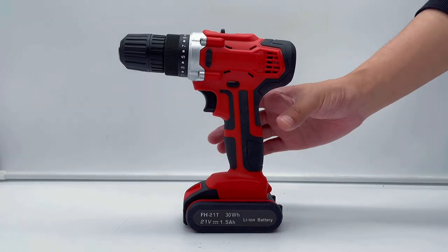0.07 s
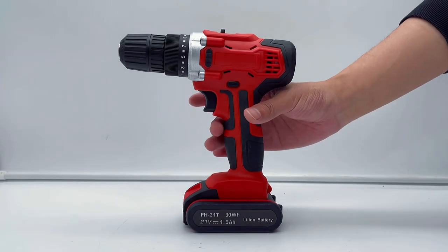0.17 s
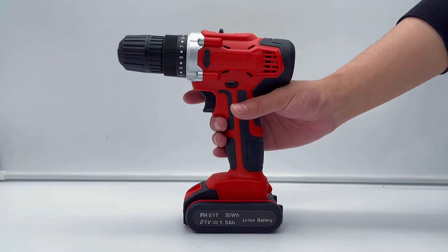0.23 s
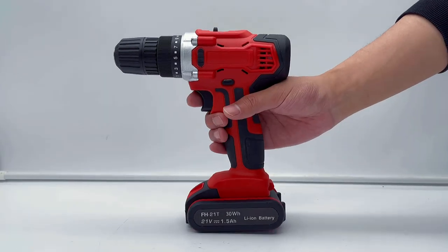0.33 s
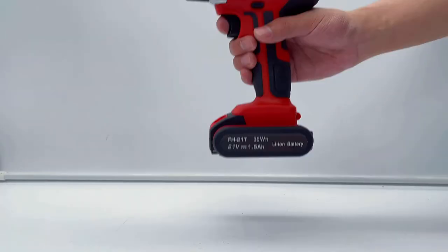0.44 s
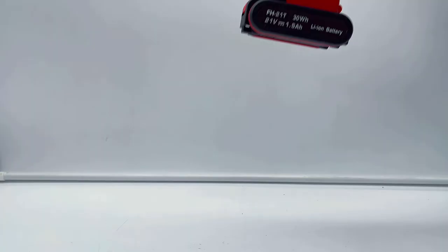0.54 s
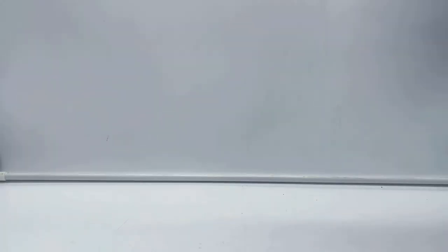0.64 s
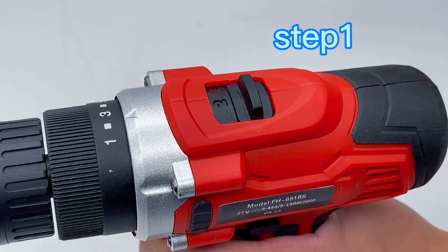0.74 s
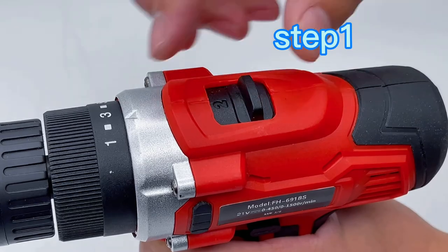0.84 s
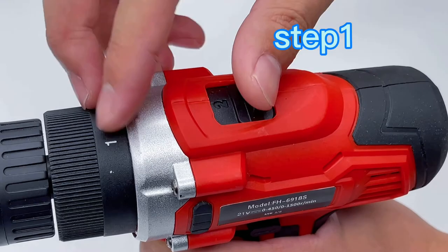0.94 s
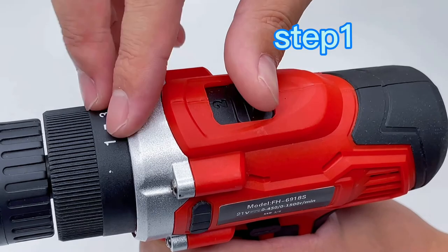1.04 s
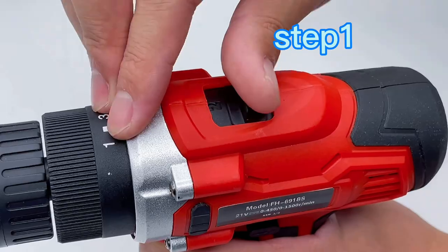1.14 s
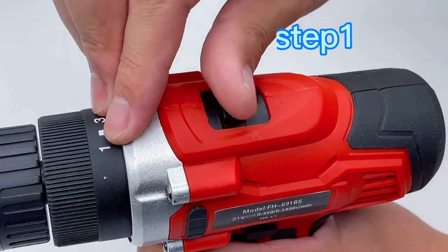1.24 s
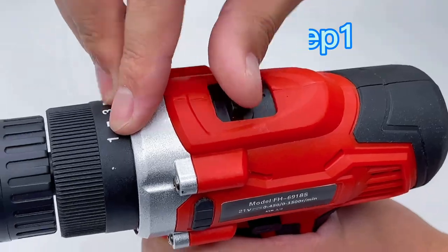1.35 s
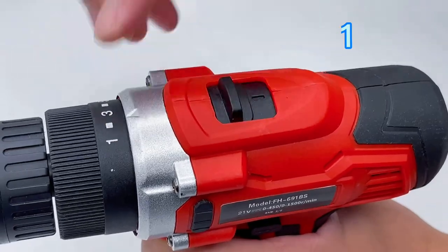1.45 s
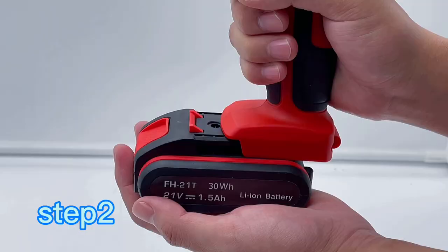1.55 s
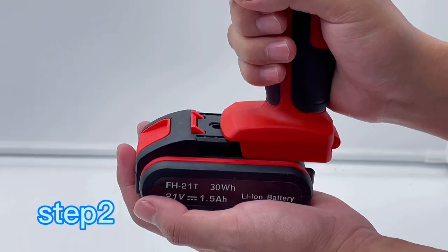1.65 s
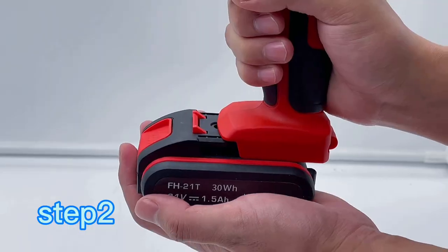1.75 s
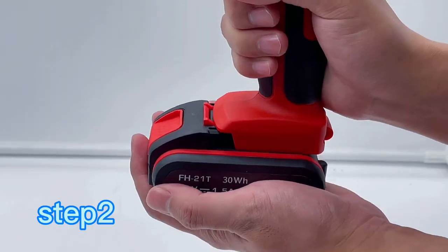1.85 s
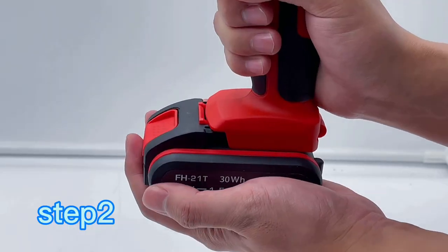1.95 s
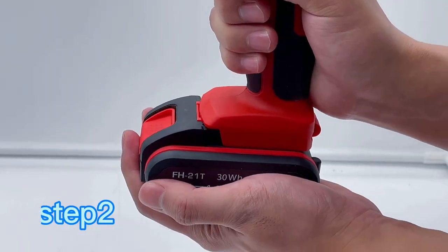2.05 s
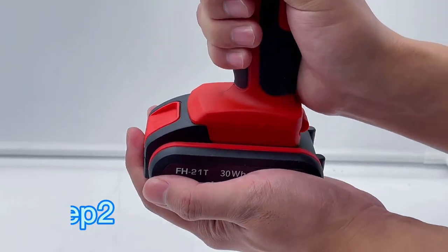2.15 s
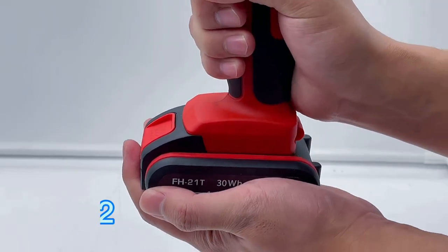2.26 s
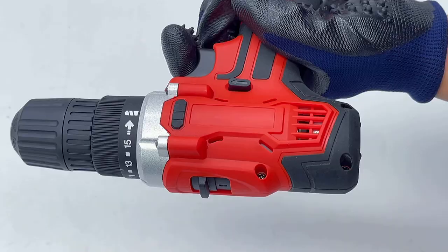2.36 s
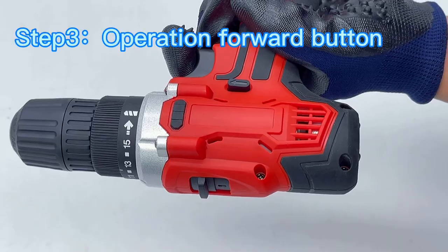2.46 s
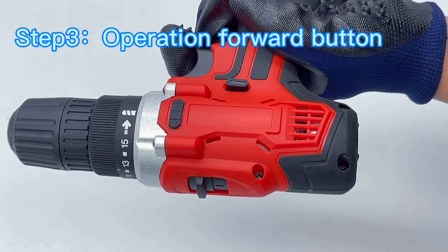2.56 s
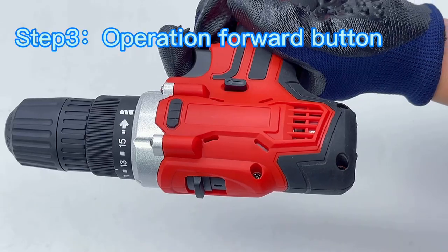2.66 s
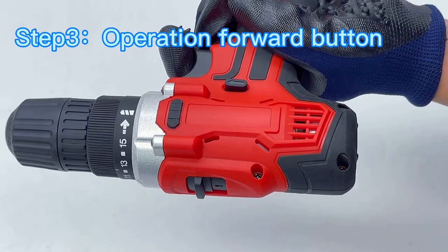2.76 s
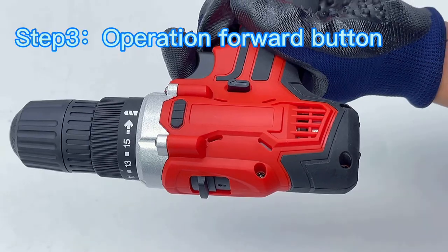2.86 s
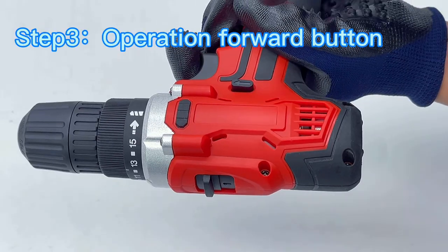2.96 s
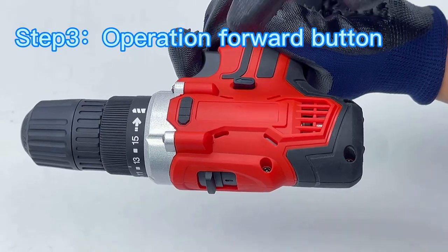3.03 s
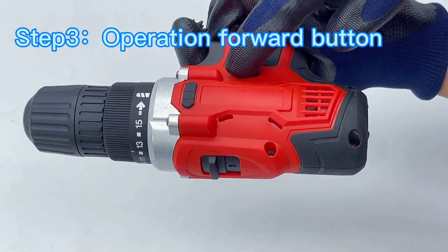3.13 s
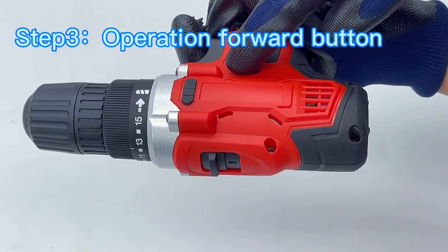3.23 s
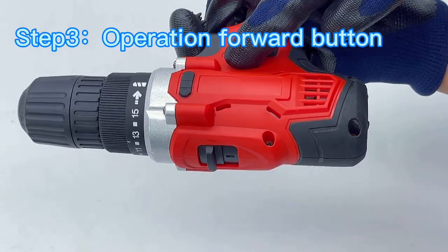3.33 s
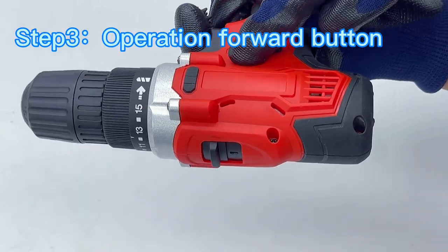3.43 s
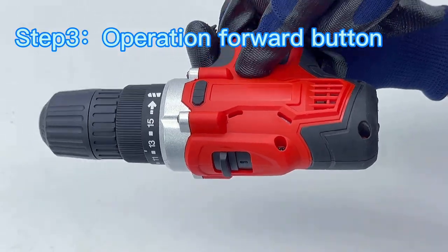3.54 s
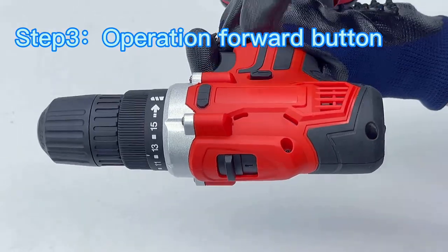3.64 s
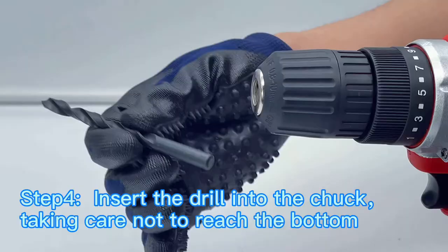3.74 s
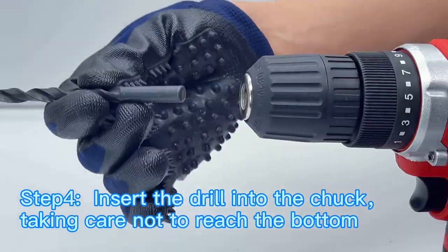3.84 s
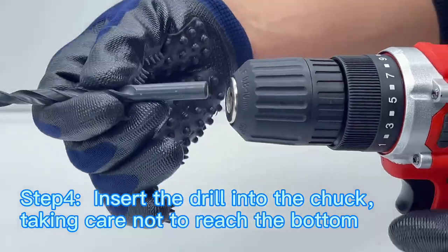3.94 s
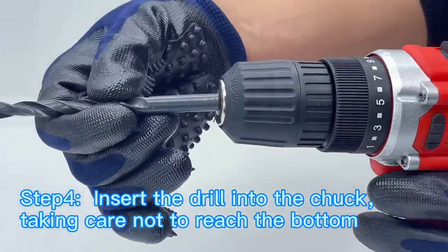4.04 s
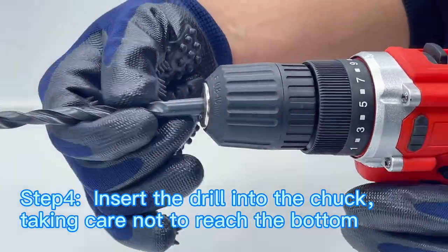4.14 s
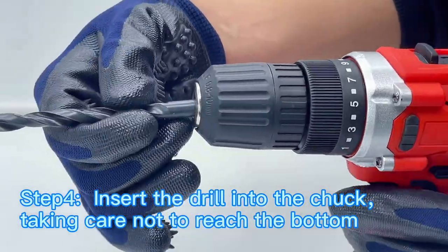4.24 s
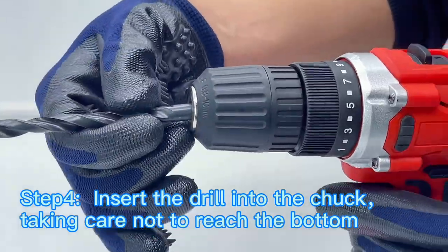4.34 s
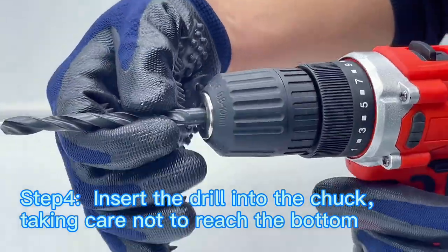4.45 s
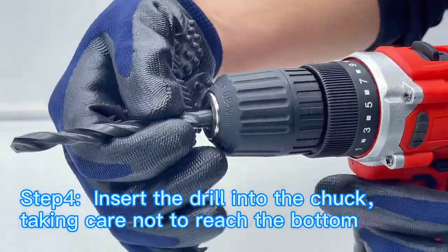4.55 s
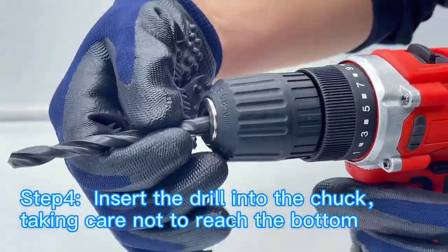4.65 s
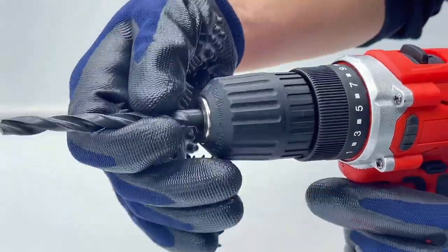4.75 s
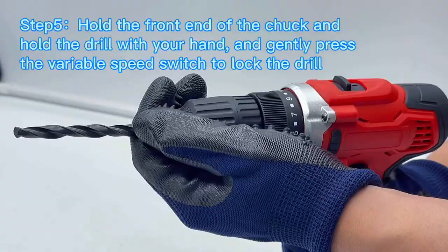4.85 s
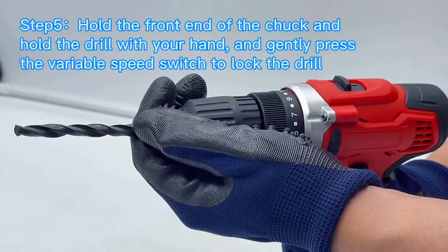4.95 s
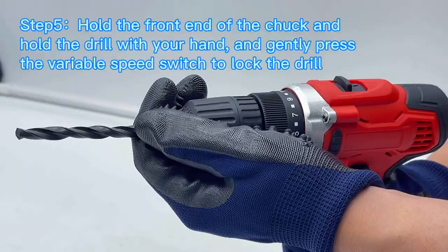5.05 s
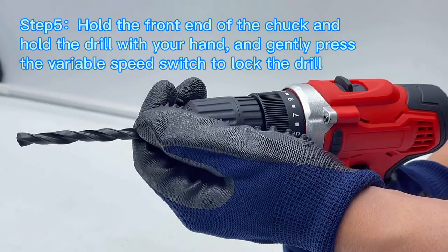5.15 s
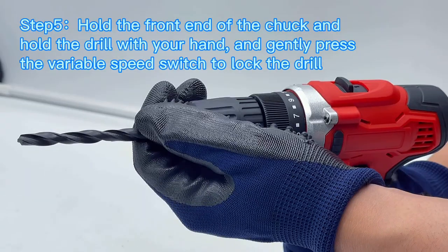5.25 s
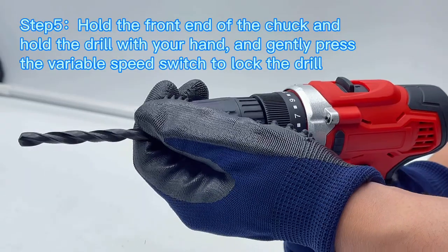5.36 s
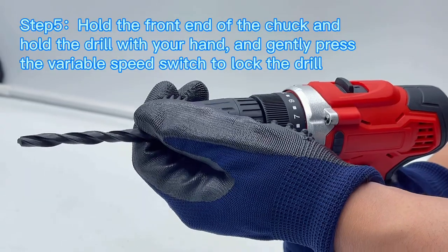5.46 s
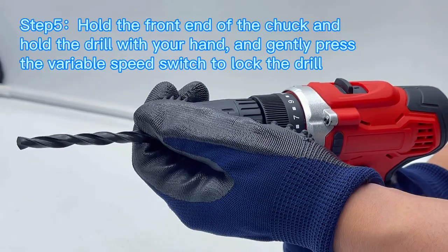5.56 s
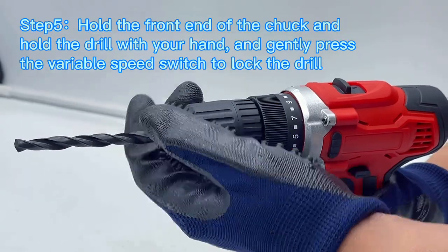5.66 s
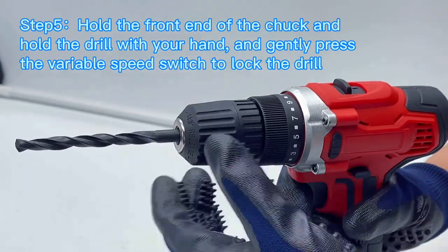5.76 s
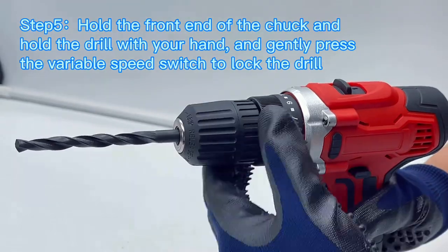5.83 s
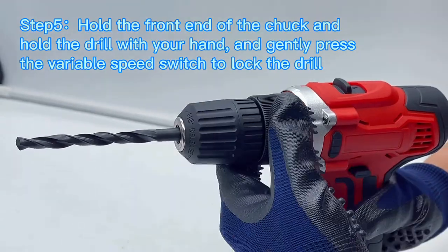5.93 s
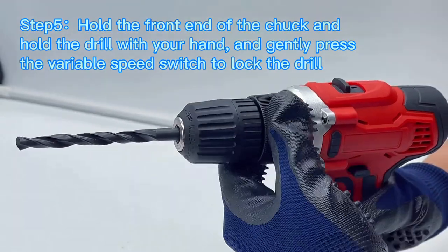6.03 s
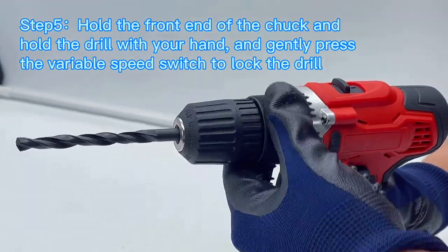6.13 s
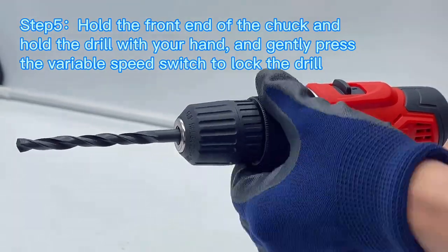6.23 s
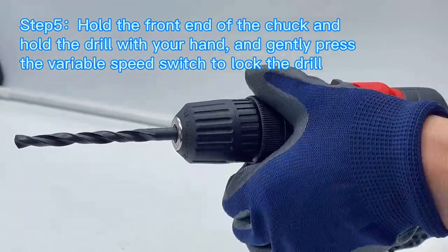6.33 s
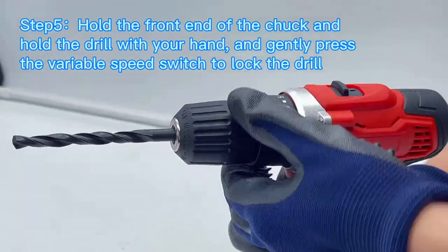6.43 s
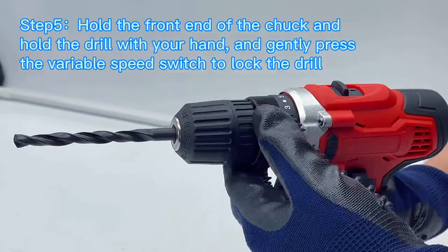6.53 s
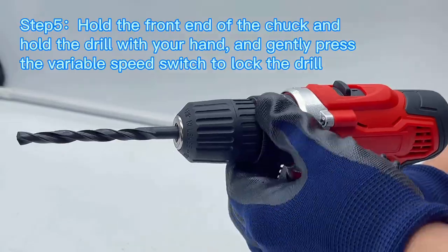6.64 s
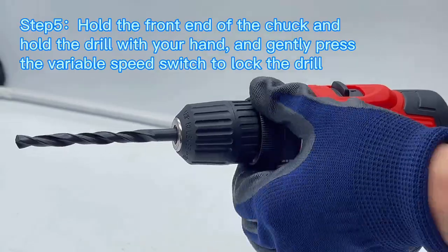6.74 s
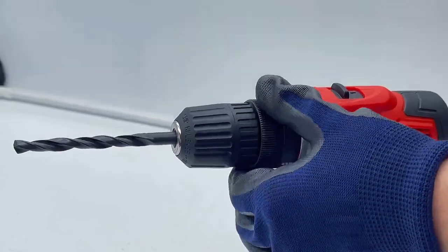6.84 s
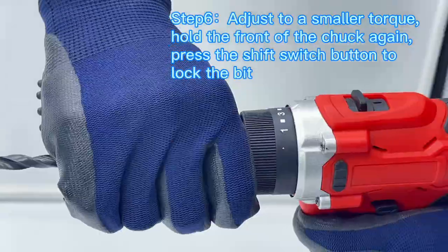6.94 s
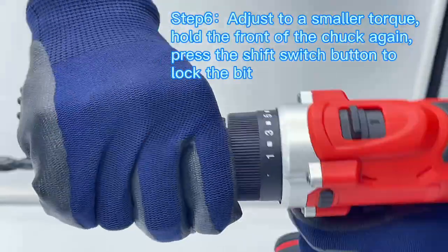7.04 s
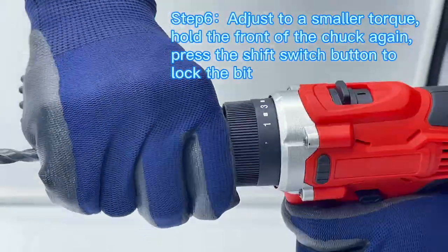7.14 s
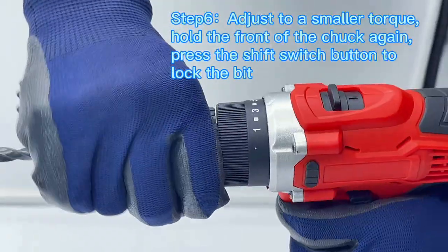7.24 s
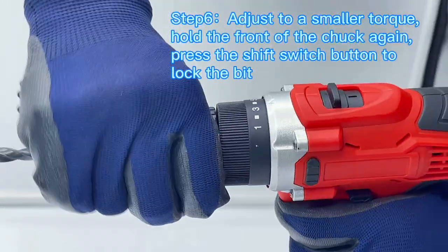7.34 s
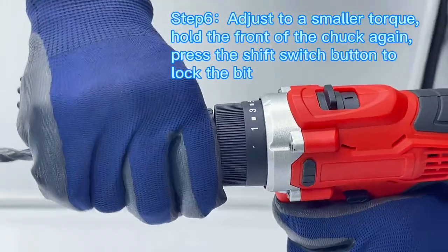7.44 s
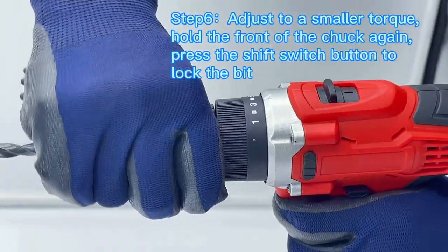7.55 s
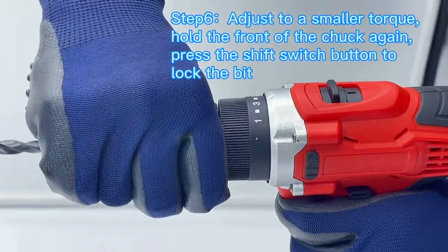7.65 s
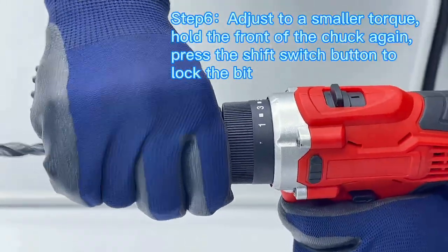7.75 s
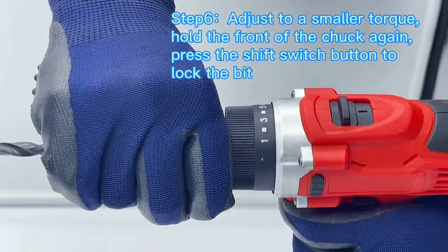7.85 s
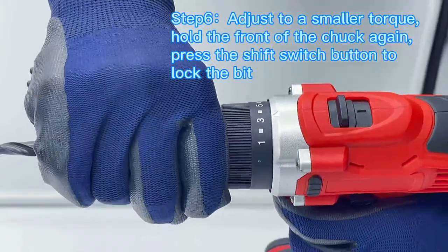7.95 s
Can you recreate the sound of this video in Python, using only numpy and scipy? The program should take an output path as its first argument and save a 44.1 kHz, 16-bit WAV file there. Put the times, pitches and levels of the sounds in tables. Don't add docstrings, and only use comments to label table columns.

```python
import sys
import numpy as np
from scipy import signal
from scipy.fft import rfft, irfft, next_fast_len
from scipy.io import wavfile
from scipy.ndimage import uniform_filter1d, map_coordinates

SR = 44100
rng = np.random.default_rng(int(sys.argv[2]) if len(sys.argv) > 2 else 0)


def gain_from_db(level_db):
    decades = np.asarray(level_db, float) / 20
    return 10 ** decades


def waveform_to_disk(signal):
    frames = np.transpose(np.atleast_2d(signal))
    scaled = np.clip(frames, -1, 1) * 32767
    samples = np.round(scaled).astype(np.int16)
    wavfile.write(sys.argv[1], SR, samples)


N = 352359
T = np.arange(N) / SR

SCENE_CHANGES = [0.6995, 1.561, 2.361, 3.762, 4.856, 6.921]
CHANGE_GAPS = [0.003, 0.00315, 0.009, 0.011, 0.0065, 0.01]
WET_DB = [-8, -22, -17.5, -17, -13, -24, -21]
TONE_DB = [-2, 0.5, 4, -1, -0.7, 0.5, 1.7]
# pitch_hz, density_db_per_hz
ROOM_TONE = [(12, -29), (20, 0), (140, -7), (200, -18), (278, -10.5), (443, -29), (668, -27), (4190, -47),
             (6860, -46), (11600, -54), (14000, -63)]
# pitch_hz, t60_s
ROOM_T60 = [(200, .6), (1000, 0.5), (2000, 0.7), (6000, 0.65), (12000, 0.55), (13500, 0.16)]
# pitch_hz, side_db
PORTS = [(100, -17), (300, -3.5), (1000, -4.5), (4000, -5.5), (8000, -7.5), (11000, 5), (14000, 2)]
# pitch_hz, level_db
OVERALL_COLOUR = [(20, -4.5), (9300, 2), (10000, -1.5), (10280, -10), (10550, 4.5), (11200, 8), (12200, -0.5),
                  (13200, -12), (14000, -27.5), (15300, -14), (17000, -27)]

# pitch_hz, density_db_per_hz
DULL_RUB = [(120, -40), (200, -11), (242, -3.5), (279, -0.5), (953, -11.5), (2050, -21.5), (2400, -25.5),
            (9000, -47.5), (11700, -67), (19800, -120)]
# pitch_hz, density_db_per_hz
BRIGHT_RUB = [(1180, -36), (2000, -6), (2700, 4), (3590, -2), (4510, -3), (9710, -7), (11500, -10.5),
              (14000, -46.5)]
# rumble_db, sway_db, dull_rub_db, bright_rub_db
HOLD = [(-76, -72, -71, -98), (-60, -54, -61, -98), (-68, -60, -61, -92), (-70, -62, -76, -98),
        (-74, -64, -70, -84), (-66, -70, -52.5, -82), (-76, -76, -68, -80)]
# peak_s, rumble_db, grow_20db_s, die_20db_s
GRIPS = [(.07, -50, .03, .25), (.64, -56, .06, .05), (1.01, -44, .03, .1), (1.2, -39, .08, .12),
         (1.4, -44, .15, .15), (2.0, -51, .08, .08), (2.108, -43, .02, .06), (4.07, -52, .02, .2),
         (4.2, -46, .1, .1), (4.42, -52, .15, .08), (4.62, -55, .1, .15), (5.705, -50, .03, .05),
         (6.05, -48, .02, .06), (6.13, -45, .02, .15), (6.3, -43, .12, .1), (6.62, -50, .05, .1),
         (6.745, -45, .08, .08), (6.95, -54, .03, .15)]

# treble_db, thud_db, t60_s
BUMPS = [(0.064, -35, 1600), (0.072, -38, 320), (0.34, -59, 1500), (1.005, -62, 960), (2.994, -49, 760),
         (3.018, -50, 740), (3.111, -60, 1800), (3.787, -53, 1815), (4.081, -46, 2710), (4.387, -43, 3950),
         (4.387, -46, 1300), (5.694, -47, 884), (6.033, -38, 1000), (6.236, -35, 500), (6.237, -38, 1300)]
BUMP = (-23, 4, .055)
TICKS = [(0.24, -56, 1500), (1.121, -42.5, 2620), (1.354, -42.5, 3930), (1.388, -41, 4120),
         (1.834, -41.5, 2350), (1.853, -37, 1180), (2.766, -54, 850), (3.322, -44.5, 2840),
         (3.586, -54.5, 1400), (3.594, -52.5, 1930), (3.864, -50, 1756), (4.306, -51, 2750),
         (4.43, -41, 3010), (4.446, -42, 4900), (4.454, -46, 5200), (4.278, -56, 5000), (4.559, -46, 2790),
         (4.761, -50, 3840)]
TICK = (-13, -16, .03)
SNAPS = [
    (1.167, -15, 4000),
    (1.167, -17, 7800),
    (3.364, -32, 2840),
    (3.364, -28.5, 7500),
    (4.047, -33, 1304),
]
SNAP = (-7, -13, .03)
LATCHES = [
    (2.081, -21, 1700),
    (2.078, -36, 3300),
    (2.089, -9, 1850),
    (2.089, -10, 3700),
    (2.1, -11, 1950),
    (2.101, -10, 8000),
    (2.106, -14, 6800),
]
LATCH = (-4.5, -9, .038)
CRACKS = [
    (1.1695, -5, 1250),
    (4.049, -25, 1300),
    (2.103, -9, 1900),
]
CRACK = (-8, -12, .02)
DETENTS = [
    (6.179, -21, 2270),
    (6.256, -26, 3500),
    (6.276, -21, 4000),
    (6.654, -21, 3200),
    (6.708, -21, 3200),
]
DETENT = (12, -14, .027)

# middle_s, level_db, length_s
DRAGS = [(.075, -60, .06), (2.77, -64, .06), (3.0, -63, .07), (1.698, -65, 0.19), (1.85, -53, .13),
         (3.586, -55.5, 0.037), (4.04, -50, 0.021), (4.135, -52.5, 0.072), (4.388, -44, .04),
         (4.842, -59, 0.04), (1.97, -66, .2), (4.12, -60, .09), (4.5, -62, .12), (5.74, -60, .08),
         (4.6, -62, .06), (5.92, -61, .18), (6.87, -54, .14), (6.479, -62.5, 0.029), (0.347, -63, 0.03)]
RUBS = [(0.262, -68, .08), (0.991, -72, 0.038), (1.375, -52.5, 0.034), (1.818, -64, .14),
        (2.08, -54, 0.009), (2.956, -65, 0.069), (3.012, -68, .05), (3.126, -69, .04), (3.35, -63, 0.092),
        (4.185, -44, .045), (4.333, -57.5, 0.12), (4.705, -47.5, 0.034), (5.88, -61, 0.12),
        (6.38, -57, .15), (4.28, -60, .05), (2.04, -71, .08)]
SLIDES = [(1.172, -42, 0.017), (2.69, -60.5, 0.12), (2.77, -61, 0.073), (3.818, -57, 0.13),
          (5.695, -53, 0.042), (6.03, -53, 0.022), (6.648, -44.5, 0.033)]
TWISTS = [(6.235, -40, .012), (6.11, -37, .03), (6.126, -31, 0.035), (6.168, -41, 0.045),
          (6.247, -32, 0.045), (6.737, -36, 0.06)]

# start_s, peak_db, pitch_hz, t60_s
THUMPS = [(.985, -39, 98, .3), (1.182, -28, 98, .25), (1.39, -39, 100, .2), (4.184, -35, 125, .15),
          (4.856, -29, 125, .12), (5.695, -33, 115, .1), (6.036, -31, 118, .2), (6.113, -27, 120, .25),
          (6.18, -35, 115, .25), (6.236, -28, 190, .08), (6.28, -26, 118, .2), (6.305, -33, 110, .2),
          (6.652, -33, 128, .3), (6.705, -38, 130, .2), (6.735, -34, 125, .3)]

# pitch_hz, level_db, t60_s
BIT_MODES = [(1250, -10, .05), (2700, -3, .07), (2790, -2, .045), (3960, -3, .07), (4090, -4, .045),
             (5620, -12, .03), (8240, -17, .05)]
# start_s, level_db, upper_modes_db, ring_time_share
BIT_TAPS = [(4.03, -50, 0, 1.1), (4.038, -45, 0, 1.1), (4.049, -38, 0, 1.1), (4.058, -48, 0, 1.2),
            (4.082, -46, -2, .7), (4.307, -50, -12, .4), (4.378, -54, 8, .7), (4.388, -52, 5, .9),
            (4.397, -58, 8, 1.1), (4.561, -40, -12, .35)]

# time_s, gear_noise_db, load_0_to_1
COAST = [
    (4.853, -42, .3),
    (4.878, -35.5, .4),
    (4.92, -38.5, 0),
    (5.14, -38.5, .1),
    (5.28, -38.5, 1),
    (5.39, -37.5, 1),
    (5.44, -39.5, 1),
    (5.55, -45, 1),
    (5.572, -60, 1),
]
# time_s, gear_noise_db, load_0_to_1
SLIP = [
    (6.925, -38, .8),
    (6.993, -28, .7),
    (7.113, -27, 1),
    (7.197, -31.5, 1),
    (7.74, -32, 1),
    (7.79, -36, .9),
    (7.815, -37, 0),
    (7.9, -37.5, 0),
    (7.95, -42, .2),
    (7.99, -56, .5),
]
# time_s, speed_hz
COAST_HZ = [(4.84, 370), (4.95, 378), (5.12, 377), (5.19, 362), (5.25, 345), (5.39, 300), (5.46, 229),
            (5.62, 195)]
# time_s, speed_hz
SLIP_HZ = [(6.92, 330), (7.05, 380), (7.12, 410), (7.68, 405), (7.73, 372), (7.78, 320), (7.82, 296),
           (7.92, 284), (7.99, 272)]
# pitch_hz, density_db_per_hz
COAST_GEARS = [(260, -47), (450, -7), (654, -1.5), (1100, -2.5), (2070, 3.5), (5740, -2), (10200, 2.5),
               (12000, -2), (13400, -34.5), (14000, -86)]
# pitch_hz, density_db_per_hz
SLIP_GEARS = [(88, -44.5), (150, -6.5), (314, -21.5), (556, -3.5), (711, -16.5), (860, -4.5), (1550, -11),
              (3440, -2.5), (4080, -6.5), (11100, -10), (14000, -44)]
# shaft_multiple, level_db
COAST_ORDERS = [(2, -12), (3, -0.5), (6.2, 2.5), (9.4, 0), (12, -3.5), (15, -8)]
# shaft_multiple, level_db
SLIP_ORDERS = [(3, -3), (6, -3), (9, 2), (12, -3), (15, -10), (18, -3)]
COAST_LAW = [(-2, 1), (-11, -4), (0, -32), (.003, .021)]
SLIP_LAW = [(-3, -5), (-1.5, -19), (-45, -28), (.0015, .022)]
# pitch_hz, width_hz, level_db
HOUSING = [(546.6, 110, 1.5), (662, 60, -6), (1238, 55, 5.5), (1900, 42, 0), (2120, 120, -3.5),
           (2621, 65, -2), (3400, 180, -2), (5060, 110, 2.5), (7640, 1300, 14), (9820, 510, 8.5)]
# time_s, level_db
COIL_DB = [(4.86, -49), (5.2, -48), (5.36, -50), (5.42, -86)]
# time_s, pitch_hz, level_db
SHAKE = [(4.858, 122.8, -33), (4.996, 122, -33), (5.124, 112, -29.5), (5.234, 118, -28.5),
         (5.404, 108, -29.5), (5.526, 118, -36), (5.724, 116.5, -47), (5.78, 118.6, -61)]
# middle_s, level_db, length_s, ring_hz
CLIMBS = [(6.975, -31, .04, 3500), (7.01, -28, .06, 3200), (7.04, -30, .03, 3600),
          (7.092, -27.5, .035, 7400), (7.145, -28, .03, 3000), (7.157, -25, .012, 7200),
          (7.215, -28, .04, 3000), (7.29, -29, .035, 3000), (7.358, -28, .035, 7350),
          (7.425, -28.5, .035, 3000), (7.495, -30, .035, 7660), (7.558, -27, .035, 6920),
          (7.625, -28, .035, 4900), (7.698, -29, .035, 4800), (7.733, -27, .02, 3300)]
# start_s, peak_db
CLUTCH = [(7.052, -8), (7.118, -9), (7.176, -8.5), (7.251, -8), (7.319, -10), (7.386, -9.5), (7.456, -9.5),
          (7.521, -8), (7.588, -9), (7.66, -9), (7.744, -8.5)]
# treble_db, thud_db, t60_s
DROP = (-3, -27, .023)


def evened(x):
    return x / np.sqrt(np.mean(x ** 2) + 1e-20)


def read(points, hz):
    f, value = np.transpose(points)
    return np.interp(np.log(hz + 1), np.log(f + 1), value)


def coloured(x, points):
    size = next_fast_len(x.shape[-1] + 2048)
    gain = gain_from_db(read(points, np.fft.rfftfreq(size, 1 / SR)))
    return irfft(rfft(x, size) * gain, size)[..., :x.shape[-1]]


def noise():
    return rng.standard_normal(N)


def band(x, lo_hz, hi_hz):
    return signal.sosfilt(signal.butter(2, [lo_hz, hi_hz], "bandpass", fs=SR, output="sos"), x)


def resonate(x, hz, width):
    turn = np.exp(2j * np.pi * np.cumsum(hz * np.ones(len(x))) / SR)
    r = np.exp(-np.pi * width / SR)
    return 2 * (turn * signal.lfilter([1 - r], [1, -r], x / turn)).real


def wander(count, hz):
    knots = rng.standard_normal(int(count / SR * hz) + 3)
    return np.interp(np.arange(count) * hz / SR, np.arange(len(knots)), knots)


def by_shot(values):
    return np.take(values, np.searchsorted(SCENE_CHANGES, T), axis=0)


def add(mix, s, sound):
    part = mix[round(s * SR):][:len(sound)]
    part += sound[:len(part)]


def hands():
    table = resonate(resonate(noise(), 105, 60), 105, 60)
    low = evened(table + 0.068 * band(noise(), 70, 280))
    deep = evened(band(noise(), 43, 81))
    dull = evened(coloured(noise() * gain_from_db(2.6 * wander(N, 150)), DULL_RUB))
    bright = evened(coloured(noise() * gain_from_db(4.0 * wander(N, 430)), BRIGHT_RUB))
    squeeze = sum(gain_from_db(db - 20 * abs(T - s) / np.where(T < s, grow, die)) for s, db, grow, die in GRIPS)
    grip, sway, soft, crisp = gain_from_db(by_shot(HOLD).T) * gain_from_db(2.5 * wander(N, 6))
    rumble = (grip + squeeze) * low + (sway + gain_from_db(-7) * squeeze) * deep
    rub = (soft + gain_from_db(-22) * squeeze) * dull + (crisp + gain_from_db(-36) * squeeze) * bright
    return rumble, rub


ROOM_TONE_DB = -60.5


def room_tone():
    return gain_from_db(ROOM_TONE_DB) * evened(coloured(noise(), ROOM_TONE)) * gain_from_db(by_shot(TONE_DB))


def port_air():
    air = gain_from_db(ROOM_TONE_DB - 15) * evened(band(coloured(noise(), ROOM_TONE), 60, 9000))
    return np.array([air, -air])


def clicks(rows, spread_s, ring_width, ring_share, rise_s, rebound):
    mix = np.zeros((2, N))
    t = np.arange(-800, 4000) / SR
    s, db, hz, treble_db, thud_db, t60 = np.transpose(rows)[:, :, None]
    luck = rng.random((len(rows), 2))
    first_s, second_s = spread_s * (.5 + luck[:, :1]), spread_s * (1.6 + luck[:, 1:])
    blows = 0
    for at, size in [(0, .8), (first_s, rebound), (second_s, .6 * rebound)]:
        blows = blows + size * (t >= at) * gain_from_db(-60 * abs(t - at) / np.maximum(t60, .02))
    creak = .16 * gain_from_db(-60 * abs(t) / .033)
    crack = rng.standard_normal(blows.shape) * (blows * np.clip(t / rise_s, 0, 1) + creak)
    tick = np.linalg.norm(crack, axis=1)[:, None] * (t == 0)
    sound = 0
    for size, lo_hz, hi_hz in [(.9, 900, 7000), (gain_from_db(treble_db), 6200, 15000), (gain_from_db(thud_db), 240, 900)]:
        pair = band(np.array([crack, tick]), lo_hz, hi_hz)
        sound = sound + gain_from_db(db) * size * pair / abs(pair[0]).max(axis=1)[:, None]
    for k in range(len(rows)):
        ring = resonate(crack[k], hz[k], ring_width)
        ring = gain_from_db(db[k] + np.array([[1.5], [-12]])) * ring_share * ring / abs(ring).max()
        for side in range(2):
            add(mix[side], s[k, 0] + t[0], sound[side, k] + ring[side])
    return mix


def plastic_clicks():
    kinds = [(SNAPS, SNAP), (LATCHES, LATCH), (BUMPS, BUMP), (TICKS, TICK)]
    return clicks([row + kind for rows, kind in kinds for row in rows], 0.0014, 280, 0.47, 0.0011, 1)


def scrapes():
    out = np.zeros(N)
    kinds = [(DRAGS, .22), (RUBS, .38), (SLIDES, .55), (TWISTS, .72)]
    strokes = [(s, db, length, .5, .4, hz) for s, db, length, hz in CLIMBS]
    strokes += [(*row, treble, 0, 1000) for rows, treble in kinds for row in rows]
    for s, db, length, treble, ring, hz in strokes:
        count = int(1.21 * length * SR)
        ticks = (rng.standard_normal(SR // 2) * gain_from_db(3.5 * wander(SR // 2, 400)))[:count]
        ribs = evened(band(ticks, 6900, 10000))
        ribs = ribs + 3.4 * treble ** 4 * evened(resonate(ticks, 11200, 670))
        body = evened(band(ticks, 1000, 4600))
        sound = treble * ribs + (1 - treble) * body + ring * evened(resonate(ticks, hz, 650))
        add(out, s - 0.64 * length, gain_from_db(db) * sound * np.hanning(count))
    return out


def thumps():
    out = np.zeros(N)
    t = np.arange(SR // 2) / SR
    rise = 1 - np.exp(-t / .006)
    for s, db, hz, t60 in THUMPS:
        add(out, s, gain_from_db(db - 60 * t / t60) * rise * np.sin(2 * np.pi * hz * t))
    return out


def hard_cracks():
    return clicks([row + CRACK for row in CRACKS], .0012, 350, .6, .0002, .35)


def battery_case(far_clicks):
    return 5.5 * resonate(far_clicks * (abs(T - 2.1) < .05), 1850, 420)


def bit():
    out = np.zeros(N)
    t = np.arange(6000) / SR
    lucks = rng.standard_normal((len(BIT_TAPS), len(BIT_MODES)))
    for (s, db, upper_db, free), luck in zip(BIT_TAPS, lucks):
        modes = 0
        for (hz, mode_db, t60), a in zip(BIT_MODES, luck):
            decay = gain_from_db(mode_db + upper_db * (hz > 3000) + 2 * a - 60 * t / (free * t60))
            modes = modes + decay * np.sin(2 * np.pi * hz * (1 + 0.009 * a) * t)
        add(out, s, gain_from_db(db) * modes * np.minimum(t / .001, 1))
    return out


def patchy(x, db):
    z = signal.stft(x, nperseg=512)[2]
    patches = uniform_filter1d(rng.standard_normal(z.shape), size=2, axis=0)
    patches = evened(uniform_filter1d(patches, size=5, axis=1))
    return signal.istft(z * gain_from_db(db * patches - db ** 2 / 9), nperseg=512)[1][:len(x)]


def motor(rows, law, speed, gears, orders, beat, loose_db):
    s, *columns = np.transpose(rows)
    t = np.arange(s[0], s[-1], 1 / SR)
    noise_db, load = (np.interp(t, s, c) for c in columns)
    knock_db, whine_db, imbalance_db, unsteady = (free + (loaded - free) * load for free, loaded in law)
    hz = uniform_filter1d(np.interp(t, *np.transpose(speed)), size=1200)
    turn = 2 * np.pi * np.cumsum(hz * (1 + unsteady * wander(len(t), 90))) / SR
    pulse = 1 + beat * np.cos(turn) + .5 * beat * np.cos(turn / 3)
    hiss = rng.standard_normal(len(t)) * pulse * gain_from_db(1.8 * wander(len(t), 150))
    teeth = rng.standard_normal((90, 361))
    knocks = map_coordinates(teeth, [np.cumsum(12 + 35 * load) / SR, turn / (6 * np.pi) % 1 * 360], order=1)
    mesh = gain_from_db(noise_db) * evened(patchy(hiss, loose_db))
    mesh = mesh + gain_from_db(noise_db + knock_db) * evened(knocks * pulse)
    mesh = mesh + 0.24 * sum(gain_from_db(g) * resonate(mesh, f, w) for f, w, g in HOUSING)
    whine = 0
    for order, db in orders:
        lift = sum(gain_from_db(g) / (1 + (2 * (order * hz - f) / w) ** 2) for f, w, g in HOUSING)
        flicker = gain_from_db((2.5 + 3.5 * load) * wander(len(t), 30))
        whine += gain_from_db(db) * flicker * (0.21 + lift) * np.sin(order * turn + 6 * rng.random())
    scale = np.std(coloured(rng.standard_normal(SR), gears))
    sound = coloured(mesh, gears) / scale * gain_from_db(-4.5)
    sound = sound + gain_from_db(noise_db + whine_db) * whine
    sound = sound + np.sqrt(2) * gain_from_db(noise_db + imbalance_db) * np.sin(turn)
    out = np.zeros(N)
    add(out, s[0], sound * signal.windows.tukey(len(t), .01))
    return out


def coil():
    hz = 3545
    s, db = np.transpose(COIL_DB)
    whistle = resonate(np.sin(2 * np.pi * hz * T) + 3 * noise(), hz, 25)
    return gain_from_db(np.interp(T, s, db, -200, -200)) * evened(whistle)


def coasting_motor():
    return motor(COAST, COAST_LAW, COAST_HZ, COAST_GEARS, COAST_ORDERS, .25, 5.5) + coil()


def shake():
    s, hz, db = np.transpose(SHAKE)
    tone = np.sin(2 * np.pi * np.cumsum(np.interp(T, s, hz)) / SR)
    flutter = evened(resonate(resonate(noise(), 118, 60), 118, 60))
    return gain_from_db(np.interp(T, s, db, -200, -200)) * (.9 * tone + .55 * flutter)


def torque_ring():
    return clicks([row + DETENT for row in DETENTS], .002, 900, .2, .0003, .65)


def slipping_motor():
    slip = motor(SLIP, SLIP_LAW, SLIP_HZ, SLIP_GEARS, SLIP_ORDERS, .3, 6)
    return slip * (1 - sum(.55 * np.exp(-((T - row[0] - .012) / .012) ** 2) for row in CLUTCH))


def clutch_rattle():
    ring_hz = rng.uniform(6800, 8600, len(CLUTCH))
    drops = [row + (hz,) + DROP for row, hz in zip(CLUTCH, ring_hz)]
    return clicks(drops, .0018, 1200, .5, .0005, .4)


def ports(x, side_db):
    size = next_fast_len(N)
    hz = np.fft.rfftfreq(size, 1 / SR)
    lead = gain_from_db(side_db + read(PORTS, hz)) * wander(len(hz), 45)
    side = irfft(1j * lead * rfft(x, size), size)[:N]
    return np.array([x + side, x - side])


def room(x):
    hz, t, z = signal.stft(rng.standard_normal((2, SR)), SR, nperseg=256)
    decay = gain_from_db(-60 * t / read(ROOM_T60, hz)[:, None]) + 3.3 * gain_from_db(-60 * t / .1)
    tail = signal.istft(z * decay * (t > .004), SR, nperseg=256)[1]
    tail = tail / np.linalg.norm(tail[0])
    edges = [0] + [round(s * SR) for s in SCENE_CHANGES] + [N]
    out = np.zeros((2, N))
    for a, b, db in zip(edges, edges[1:], WET_DB):
        out[:, a:b] = gain_from_db(db) * signal.fftconvolve(x[None, a:b], tail, axes=1)[:, :b - a]
    return out


def scene():
    rumble, rub = hands()
    clicking, far_clicks = plastic_clicks()
    cracks, far_cracks = hard_cracks()
    notches, far_notches = torque_ring()
    rattle, far_rattle = clutch_rattle()
    strokes = scrapes() + bit()
    coast = coasting_motor()
    slip = slipping_motor()
    near = ports(rumble + shake() + thumps(), 0.1)
    near = near + ports(rub + room_tone(), 3)
    near = near + ports(coast, 4) + ports(slip, 0.1)
    near = near + ports(clicking + cracks + notches + rattle + strokes, -2)
    far = far_clicks + far_cracks + far_notches + far_rattle + strokes + battery_case(far_clicks)
    wet = room(gain_from_db(2.5) * far + gain_from_db(15) * band(coast, 300, 4500) + gain_from_db(14) * slip)
    return port_air() + near + wet


def top_cut(x):
    return signal.sosfilt(signal.butter(12, 16970, fs=SR, output="sos"), x)


def record(dry):
    recover_s, recover_db_per_s = 2.12, 22
    recovering = (T > recover_s) * (T < SCENE_CHANGES[2])
    gain = gain_from_db(recover_db_per_s * (T - recover_s) * recovering)
    for s, gap in zip(SCENE_CHANGES, CHANGE_GAPS):
        gain *= np.clip((abs(T - s) - gap / 2) / 0.00095, 0, 1)
    return top_cut(coloured(dry, OVERALL_COLOUR) * gain)


dry = scene()
out = record(dry)
waveform_to_disk(out)
```